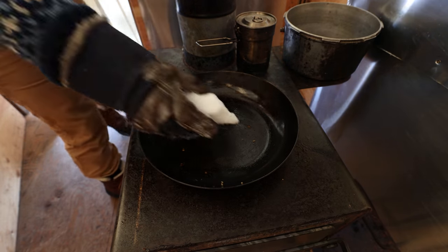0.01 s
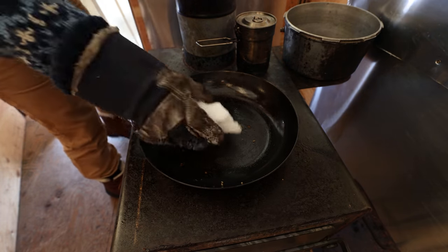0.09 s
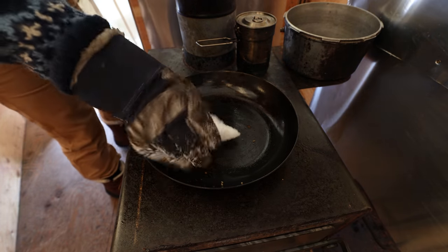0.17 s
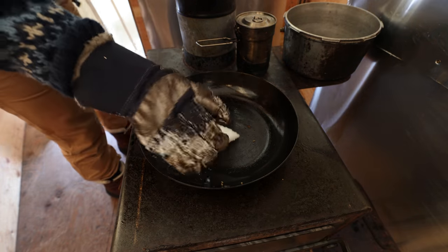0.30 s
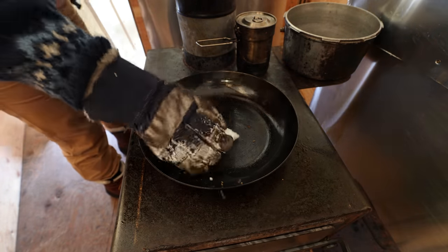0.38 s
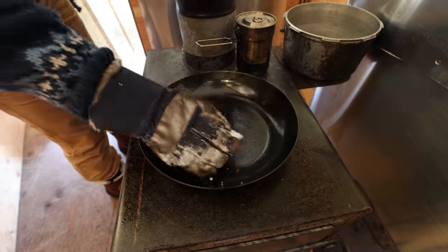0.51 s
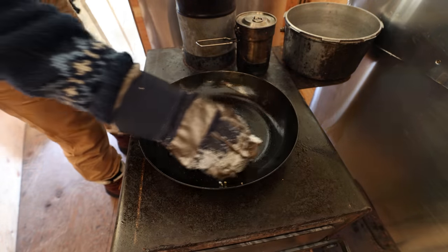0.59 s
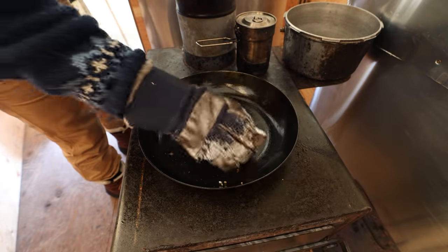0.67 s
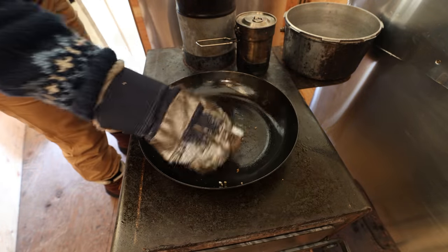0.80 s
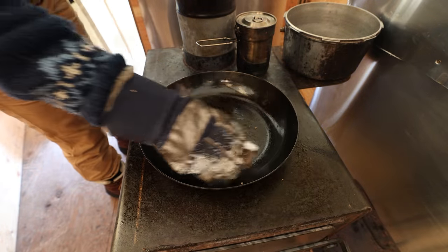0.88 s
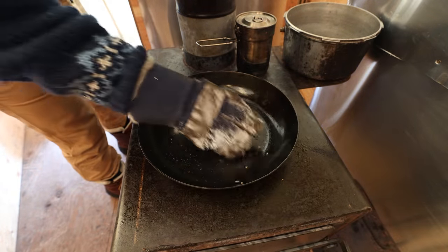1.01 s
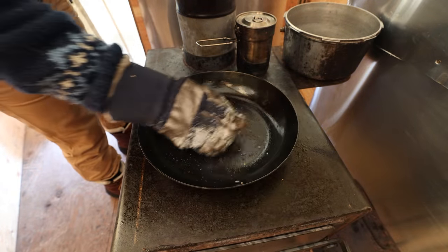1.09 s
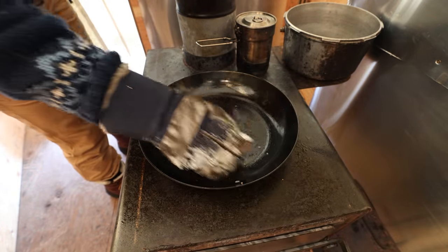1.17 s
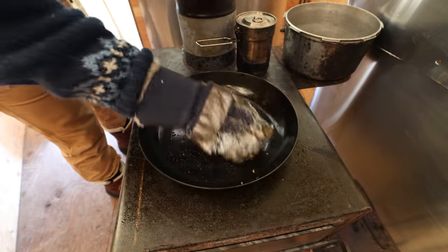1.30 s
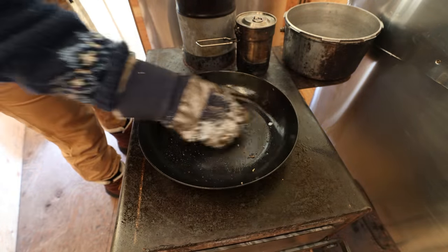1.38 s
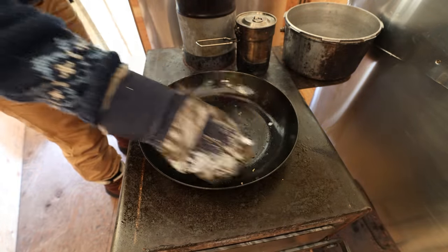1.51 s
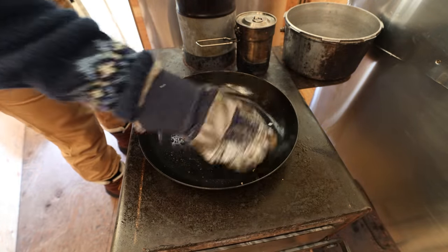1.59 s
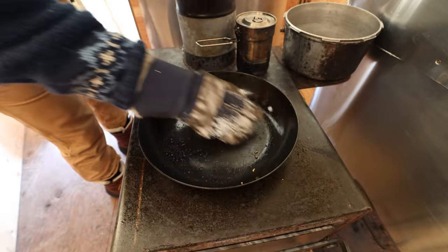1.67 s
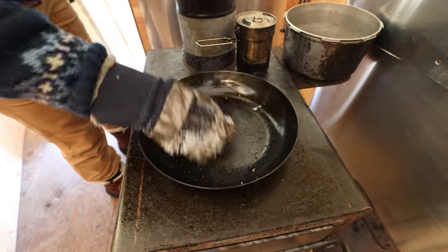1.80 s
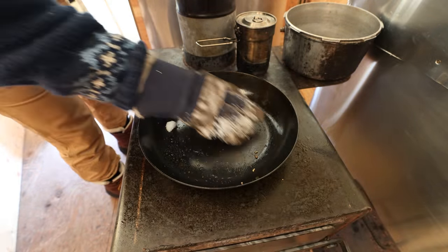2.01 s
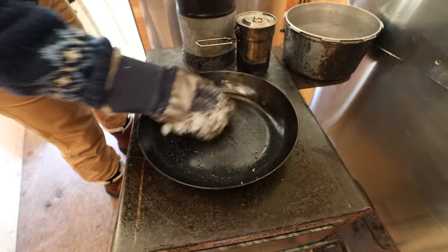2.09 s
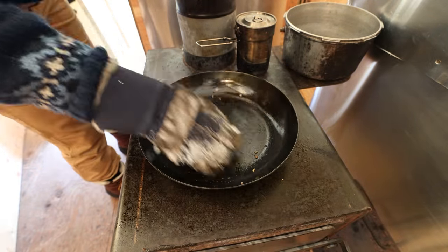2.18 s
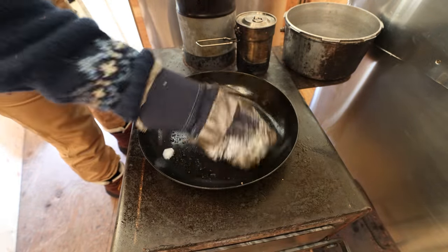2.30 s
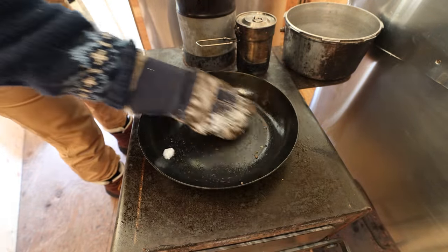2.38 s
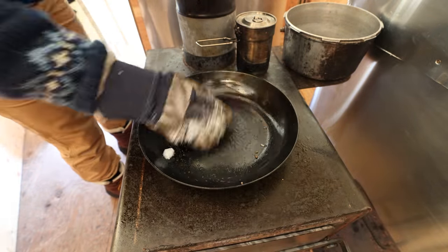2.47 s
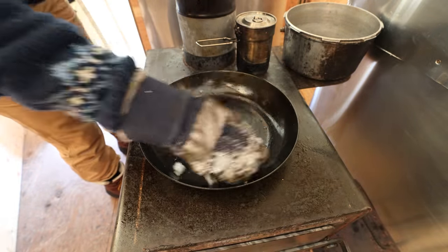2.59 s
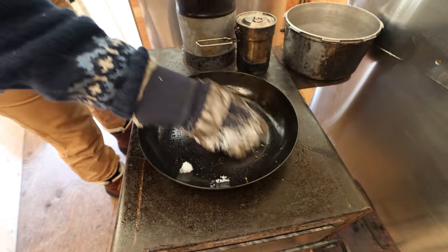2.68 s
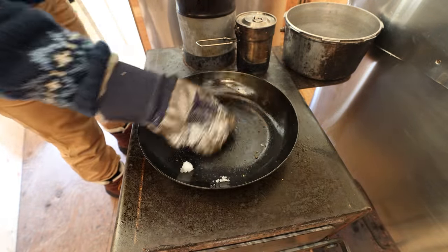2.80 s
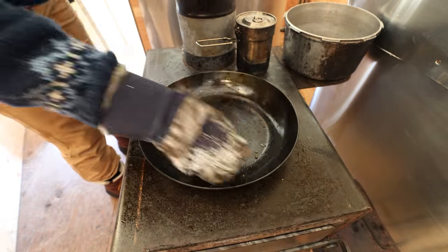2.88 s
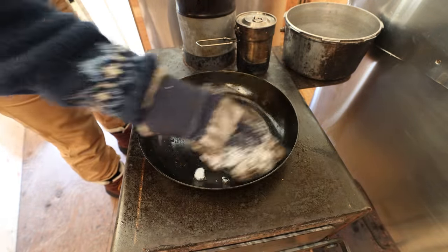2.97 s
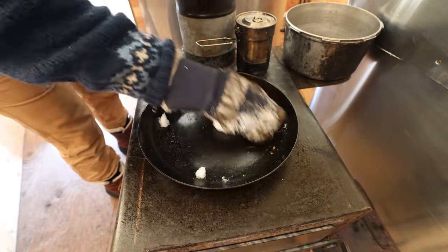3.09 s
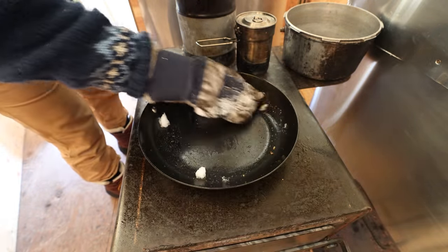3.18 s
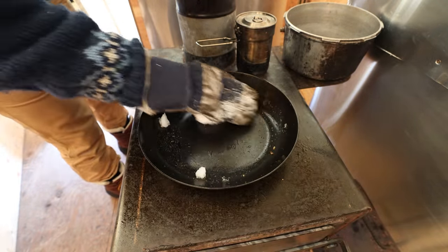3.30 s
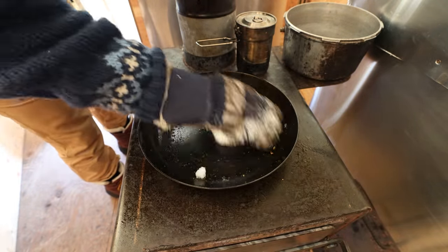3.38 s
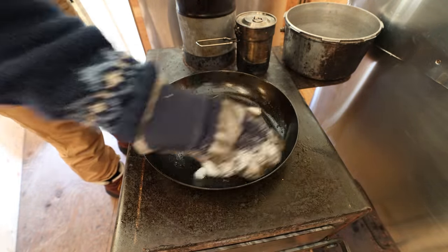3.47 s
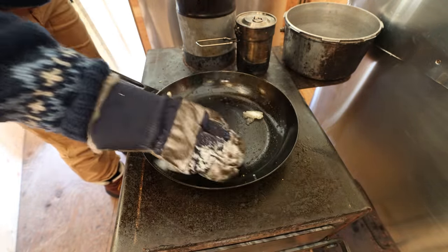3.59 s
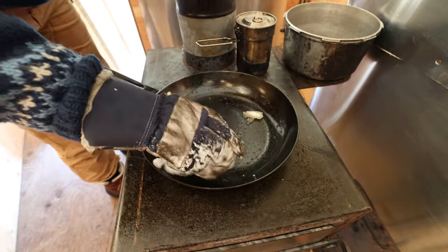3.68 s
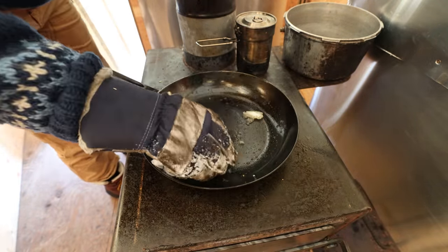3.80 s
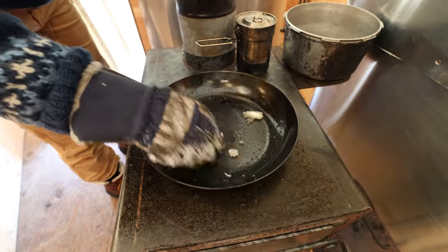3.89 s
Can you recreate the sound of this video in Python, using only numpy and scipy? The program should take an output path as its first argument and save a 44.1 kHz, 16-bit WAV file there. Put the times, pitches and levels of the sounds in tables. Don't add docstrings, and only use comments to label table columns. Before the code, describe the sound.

Coarse snow rubs a steel pan on a softly rumbling stove. Faint touches and small bumps lead to two hard, crumbling knocks at 0.22 and 0.32 s, with brief pan ring and low plate hum. From 0.6 s, uneven to-and-fro scrubbing crunches and fizzes, strongest around 1.1-2.5 s, with sharp icy snaps. It weakens after 3 s, leaving sparse ticks by 3.7. Close, dry tent acoustics.

```python
import sys
import numpy as np
from scipy import signal
from scipy.fft import rfft, irfft, next_fast_len
from scipy.io import wavfile
from scipy.ndimage import uniform_filter1d, map_coordinates

SR = 44100
rng = np.random.default_rng(int(sys.argv[2]) if len(sys.argv) > 2 else 0)


def put_to_file(sound):
    columns = np.atleast_2d(sound).T
    safe = np.clip(columns, -1, 1)
    whole_steps = np.round(safe * 32767)
    wavfile.write(sys.argv[1], SR, whole_steps.astype(np.int16))


def volts(x):
    e = np.asarray(x, float) / 20
    return 10 ** e


N = 171990


def unit(x):
    return x / np.sqrt(np.mean(x ** 2) + 1e-20)


def wobble(rate):
    knots = rng.standard_normal(int(N * rate / SR) + 4)
    return map_coordinates(knots, [np.arange(N) * rate / SR])


def filtered(x, response):
    m = next_fast_len(len(x) + 8192)
    return irfft(rfft(x, m) * response(np.fft.rfftfreq(m, 1 / SR)), m)[:len(x)]


def colour(points):
    hz, db = np.transpose(points)
    return lambda f: volts(np.interp(np.log(f + 1), np.log(hz), db, -120, -120))


def modes(table):
    def response(f):
        total = 0
        for k, (centre, width, db) in enumerate(table):
            resonance = 1j * f * width / (centre * centre - f * f + 1j * f * width)
            total = total + (-1) ** k * volts(db) * resonance
        return total
    return response


# pitch_hz, density_db [dB per Hz]
DRAUGHT = [(20, -8), (60, -2.5), (95, -14), (150, -10.5), (310, -16.5), (500, -11), (1300, -25.5),
           (4000, -31), (16000, -51)]


def stove():
    level = volts(-51.5 + 1.5 * wobble(5.73))
    return level * unit(filtered(rng.standard_normal(N), colour(DRAUGHT)))


def scattered(x, table):
    parts = [filtered(x * np.sign(rng.standard_normal(N)), modes([row])) for row in table]
    return unit(sum(parts))


# pitch_hz, width_hz, level_db
HOLLOW = [(1250, 318, 10.5), (1480, 386, 3)]
# time_s, centre_hz
HOLLOW_PATH = [(.6, 1280), (.76, 1436), (.93, 1300), (1.1, 1480), (1.28, 1330), (1.45, 1550), (1.62, 1300),
               (1.77, 1630), (1.97, 1250), (2.12, 1610), (2.31, 1312), (2.46, 1610), (2.66, 1336),
               (2.8, 1530), (3.0, 1330), (3.11, 1270), (3.45, 1530), (3.65, 1270)]
STRETCHES = [.88, 1, 1.19]
REST_HZ = 1350


def cupped(x):
    s, hz = np.transpose(HOLLOW_PATH)
    stretch = np.interp(np.arange(N) / SR, s, hz) / REST_HZ
    place = np.interp(stretch, STRETCHES, np.arange(len(STRETCHES)))
    total = np.zeros(N)
    for k, step in enumerate(STRETCHES):
        share = np.sqrt(np.clip(1 - abs(place - k), 0, 1))
        total += share * filtered(x, lambda f: modes(HOLLOW)(f / step))
    return total


PAN_HZ = [2070, 2870, 3040, 3350, 3830, 3965, 4840, 5050, 5590, 6160, 6390]
# width_hz, level_db
PAN_DAMPING = [(312, 2.5), (78, 3.5), (250, -4), (364, -4.5), (100, -0.5), (158, -0.5), (90, 1.5),
               (292, -12), (102, -0.5), (99, -6), (130, -8)]
# pitch_hz, width_hz, level_db
RIM = [(7400, 350, 0), (8140, 80, -1), (8420, 200, 1), (8920, 100, -2), (9360, 110, 1), (9660, 50, 0),
       (10450, 80, -1), (11540, 170, -1), (12500, 90, -6), (12750, 110, -3), (13050, 70, -7),
       (14050, 300, -3), (15400, 330, -5)]
# pitch_hz, density_db [dB per Hz]
RASP = [(150, -51), (320, -23), (500, -10), (900, -3.5), (1700, 1), (3300, -9), (6000, -7.5), (9000, -19)]
# pitch_hz, density_db [dB per Hz]
FIZZ = [(4000, -10), (7000, -14), (10000, -14), (13400, -14), (15700, -40)]
RASP_DB, SPRAY_DB, HOLLOW_DB, FIZZ_DB = -6, -4.5, -2, -10


def voices(x, spray):
    pan = [(hz, width, db) for hz, (width, db) in zip(PAN_HZ, PAN_DAMPING)]
    ring = scattered(x, pan) + volts(RASP_DB) * unit(filtered(x, colour(RASP)))
    fizz = scattered(x, RIM) + volts(SPRAY_DB) * unit(filtered(spray, colour(FIZZ)))
    return unit(ring), volts(HOLLOW_DB) * unit(cupped(x)), volts(FIZZ_DB) * unit(fizz)


# start_s, peak_db, t60_s
SNAPS = [(0.012, -31.5, 0.019), (0.157, -28, 0.0074), (0.471, -26, 0.0084), (0.501, -22, 0.013),
         (0.584, -13.5, 0.017), (0.923, -16, 0.011), (0.9455, -15, 0.013), (1.45, -13, 0.038),
         (1.8605, -10.5, 0.017), (1.8894, -15, 0.035), (1.954, -12, 0.02), (2.0372, -16.5, 0.018),
         (2.1954, -26, 0.012), (2.306, -9, 0.0096), (2.4442, -8.5, 0.022), (2.9012, -16, 0.011),
         (3.0044, -16, 0.016), (3.259, -18, 0.02), (3.4165, -20, 0.012), (3.7584, -37, 0.012),
         (3.8521, -21.5, 0.041)]
# start_s, peak_db
TICKS = [(0.6609, -24), (1.078, -19), (1.739, -21), (2.2668, -18), (2.4307, -20), (2.6647, -15),
         (2.6956, -18), (2.7731, -25), (2.7888, -20), (3.007, -20), (3.3892, -29), (3.4062, -24),
         (3.469, -33), (3.5828, -25), (3.7824, -35), (3.7903, -28.5), (3.824, -29)]
TICK_T60_S, SNAP_RISE_S = 0.018, .0007


def snaps():
    burst, t = np.full(N + SR, 1e-6), np.arange(SR // 10) / SR
    rise = 1 - np.exp(-t / SNAP_RISE_S)
    for s, db, t60 in SNAPS + [(s, db, TICK_T60_S) for s, db in TICKS]:
        burst[round(s * SR):][:len(t)] += volts(db - 9.0 - 60 * t / t60) * rise
    x = burst[:N] * rng.standard_normal(N)
    balance = volts([-.3, .3, -1.5])
    return np.dot(balance, voices(x, x)) * np.sqrt(np.mean(x ** 2))


# start_s, length_s, level_db
ROCKS = [(0.022, 0.03, -43.5), (0.083, 0.017, -79), (0.115, 0.014, -73), (0.218, 0.018, -38.5),
         (0.323, 0.044, -39.5), (0.382, 0.05, -58), (0.48, 0.082, -46), (1.14, .03, -47),
         (1.472, 0.029, -48), (1.813, 0.064, -47), (2.172, 0.015, -36), (2.209, 0.01, -43),
         (2.809, 0.021, -38.5), (2.841, 0.02, -41), (2.869, 0.052, -40.5), (3.227, 0.052, -40),
         (3.316, 0.043, -39), (3.618, 0.021, -40.5), (3.85, 0.019, -41.5)]
# pitch_hz, width_hz, level_db
STOVE_TOP = [(117, 15, -9.5), (148, 10, -5), (226, 20, 3), (525, 70, -4), (680, 250, -12)]


def rocks():
    t = np.arange(N) / SR
    push = np.zeros(N)
    for s, length, db in ROCKS:
        u = np.clip((t - s) / (0.4 * length), 0, 50)
        push += volts(db) * u * np.exp(1 - u)
    x = push * rng.standard_normal(N)
    return unit(filtered(x, modes(STOVE_TOP))) * np.sqrt(np.mean(x ** 2))


def grit(rough_db, click_db):
    clumps = volts(rough_db * (wobble(45) + wobble(130) + 0.59 * wobble(500)))
    sizes = volts(click_db * rng.exponential(size=N))
    return unit(clumps * sizes * rng.standard_normal(N))


def patchy(x, patchy_db):
    z = signal.stft(x, nperseg=512)[2]
    field = uniform_filter1d(rng.standard_normal(z.shape), 5, 0)
    field = uniform_filter1d(field, 9, 1)
    return unit(signal.istft(z * volts(patchy_db * unit(field)), nperseg=512)[1][:N])


# middle_s, half_length_s, peak_db, hollow_db, fizz_db [both relative to peak]
TOUCHES = [
    (0.031, 0.024, -50, -3.5, -4),
    (0.195, 0.016, -56, 0, -2),
    (0.253, 0.031, -44.5, -3, -6),
    (0.31, 0.0088, -46.5, -6, -3),
    (0.364, 0.04, -39.5, -12.5, -2.5),
    (0.48, 0.0074, -42, -10, -2),
    (0.504, .01, -32.5, -13, -8),
    (0.537, 0.046, -47, 2, 1),
    (3.815, 0.025, -48.5, -7, -2),
]
# time_s, level_db
PRESS = [(.6, -37.5), (.9, -31), (1.22, -33), (1.55, -36), (1.85, -34), (2.0, -32.5), (2.38, -36.5),
         (2.58, -35), (2.76, -39.5), (3.15, -38), (3.37, -52.5), (3.5, -44), (3.7, -50), (3.76, -52.5),
         (3.9, -52.5)]
# middle_s, half_length_s, peak_db, hollow_db, fizz_db [both relative to peak]
STROKES = [(0.695, 0.07, -33, -2, 2), (0.82, 0.028, -30, -3, -3), (0.924, 0.075, -35.5, 7, -15),
           (1.115, 0.066, -27, -5, -0.5), (1.29, 0.034, -27, -1, -5), (1.435, 0.086, -27, -8, -1),
           (1.628, 0.061, -30.5, -2, -1.5), (1.772, 0.049, -26, -24, -0.5), (1.978, 0.023, -32.5, 5, -9),
           (2.12, 0.05, -27.5, -6.5, 0), (2.196, .03, -47, -10, 21.5), (2.317, 0.039, -33.5, 3, -2),
           (2.469, 0.043, -30, -27, -1), (2.665, 0.059, -32, -1.5, -1), (2.803, 0.027, -31, -10, -2.5),
           (2.986, 0.083, -34.5, -3, -12), (3.103, 0.05, -35.5, -2, 3), (3.24, 0.062, -36, -6.5, 9),
           (3.327, 0.025, -39, -12, 9.5), (3.411, 0.024, -37.5, -10, 2.5), (3.515, 0.045, -34.5, -9.5, 0),
           (3.613, 0.023, -36, -2, 4.5), (3.675, 0.021, -40, -2, 5.5)]
ONSET_S, RISE_S = 0.587, 0.039


def effort():
    t = np.arange(N) / SR
    s, db = np.transpose(PRESS)
    contact = np.clip((t - ONSET_S) / RISE_S, 0, 1)
    steady = volts(np.interp(t, s, db)) ** 2 * contact ** 2
    power = volts([[0], [-8.5], [-1]]) ** 2 * steady
    for mid, half, db, hollow_db, fizz_db in STROKES + TOUCHES:
        swell = np.exp(-1.4 * ((t - mid) / half) ** 2)
        power += volts([[db], [db + hollow_db], [db + fizz_db]]) ** 2 * swell
    return np.sqrt(power)


# pitch_hz, width_hz, level_db
BASE = [(137, 13, -16), (223.7, 18.6, 0), (405, 72, -3.5), (526, 72, -4.5)]


def scrub():
    gains, grains = effort(), grit(rough_db=0.75, click_db=2.0)
    drag = volts(-20.5 + 1.1 * wobble(8.2)) * gains[0]
    drag = drag * unit(filtered(rng.standard_normal(N), modes(BASE)))
    heard = voices(grains, grit(rough_db=3.8, click_db=3))
    return sum(g * patchy(v, patchy_db=2.0) * np.std(v) for g, v in zip(gains, heard)) + drag


# middle_s, half_length_s, level_db
LEANS = [(0.184, 0.013, -53), (.7, 0.05, -46), (1.13, 0.037, -40), (1.288, 0.026, -60), (1.396, 0.036, -46),
         (1.448, 0.022, -39), (1.786, 0.027, -51), (1.878, 0.0071, -43), (2.13, .03, -55),
         (2.18, 0.016, -40), (2.203, .01, -44), (2.468, .03, -42.5), (2.654, .03, -59),
         (3.098, 0.016, -42.5), (3.262, 0.015, -49), (3.335, .02, -52), (3.494, 0.069, -46.5),
         (3.86, 0.011, -45)]
# pitch_hz, density_db [dB per Hz]
BODY = [(150, -29), (300, -6), (520, 1), (800, 3.5), (1200, -39)]


def leans():
    t = np.arange(N) / SR
    power = sum(volts(db) ** 2 * np.exp(-((t - mid) / half) ** 2) for mid, half, db in LEANS)
    return np.sqrt(power) * unit(filtered(grit(rough_db=0.0, click_db=3.5), colour(BODY)))


# start_s, peak_db, crumble_t60_s, rise_s, into_pan_db
KNOCKS = [
    (0.223, -7, 0.043, 0.0025, -16),
    (0.322, -6.5, 0.053, 0.0009, -6),
]
# pitch_hz, level_db, t60_s
RINGS = [
    [(807, -26, 0.22), (1334, -5, 0.057), (2083, -12.5, 0.11), (3110, -2, 0.024), (4810, -6, 0.047),
     (14100, -19, .05)],
    [(216, -15, 0.15), (538, -16, 0.08), (1500, -6.5, 0.077), (2030, 0, 0.042), (2820, -3.5, 0.11),
     (3820, -11, 0.11)],
]
# pitch_hz, density_db [dB per Hz]
CRACK = [(150, -23), (350, 0), (700, -25), (1400, -14), (2900, 0), (4900, -3.5), (7800, -16.5),
         (16000, -22)]
BLOW, BLOW_S = 1.1, .002
RING_DB = -8


def knocks():
    out, burst, t = np.zeros(N), np.full(N, 1e-7), np.arange(SR // 4) / SR
    for (s, db, t60, rise, pan_db), table in zip(KNOCKS, RINGS):
        start = (1 - np.exp(-(t / rise) ** 2)) * (1 + BLOW * np.exp(-t / BLOW_S))
        chips = rng.standard_normal(len(t)) * volts(2 * rng.exponential(size=len(t)))
        crack = unit(filtered(chips, colour(CRACK))) * volts(-11.5 - 60 * t / t60)
        ring = np.zeros(len(t))
        for hz, level_db, ring_t60 in table:
            phase = 2 * np.pi * hz * t + wobble(118)[:len(t)]
            ring += volts(level_db - 60 * t / ring_t60) * np.sin(phase)
        out[round(s * SR):][:len(t)] += volts(db) * start * (crack + volts(RING_DB) * ring)
        into_pan = volts(db + pan_db - 12 - 60 * t / t60) * start * unit(chips)
        burst[round(s * SR):][:len(t)] += into_pan
    return out + sum(voices(burst, burst)) * np.sqrt(np.mean(burst ** 2))


# start_s, pitch_hz, level_db, t60_s
SHUDDERS = [
    (.345, 150, -40, .15),
    (.37, 120, -41, .12),
    (.42, 130, -41, .12),
    (.46, 130, -42, .1),
    (.505, 140, -43, .07),
]
SHUDDER_RISE_S = 0.0027


def shudders():
    t = np.arange(N) / SR
    out = np.zeros(N)
    for s, hz, db, t60 in SHUDDERS:
        u = np.clip(t - s, 0, 1)
        envelope = volts(db - 60 * u / t60) * (1 - np.exp(-u / SHUDDER_RISE_S))
        out += envelope * np.sin(2 * np.pi * hz * u)
    return out


def tent(x):
    t = np.arange(SR // 5) / SR
    tail = rng.standard_normal(len(t)) * volts(-60 * t / .08) * (t > .003)
    return signal.fftconvolve(x, tail / np.linalg.norm(tail))[:N]


def scene():
    near = scrub() + snaps() + knocks() + rocks() + leans() + shudders()
    return (near + volts(-13) * tent(near) + stove())[None]


def low_pass(x):
    return signal.sosfilt(signal.butter(12, 16500, fs=SR, output="sos"), x)


def record(dry):
    mix = filtered(dry[0], lambda f: np.where(f < 15760, 1, volts(-50)))[None]
    return low_pass(mix)


dry = scene()
out = record(dry)
put_to_file(out)
```